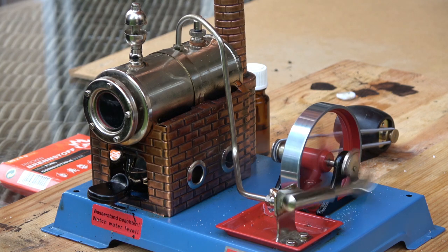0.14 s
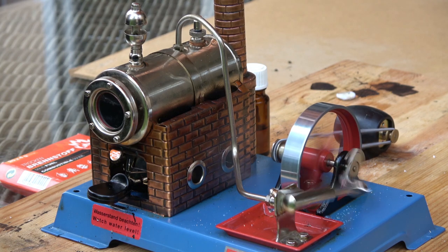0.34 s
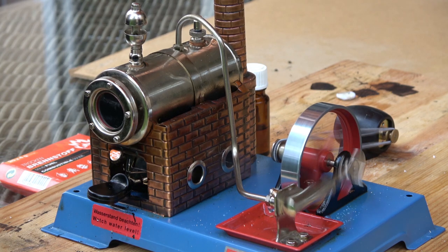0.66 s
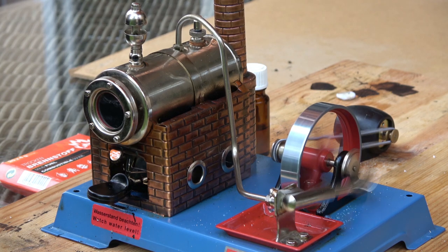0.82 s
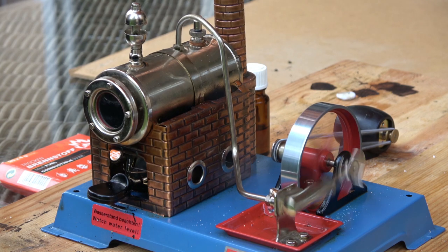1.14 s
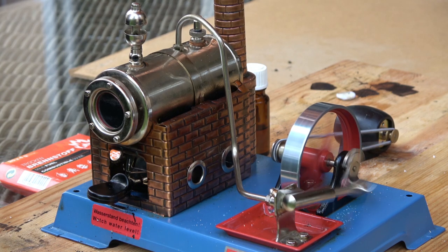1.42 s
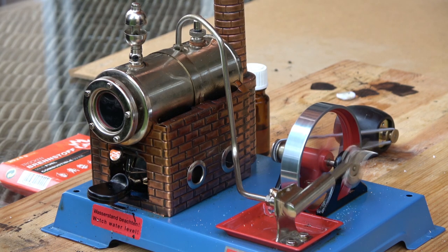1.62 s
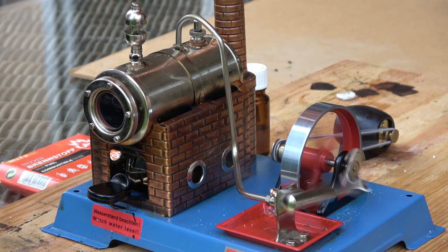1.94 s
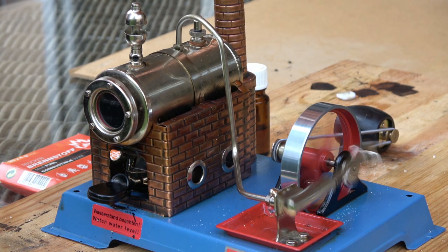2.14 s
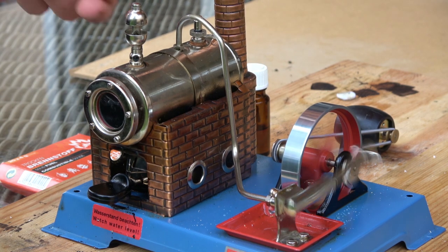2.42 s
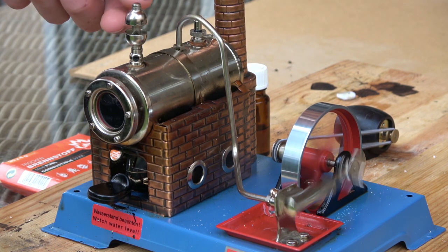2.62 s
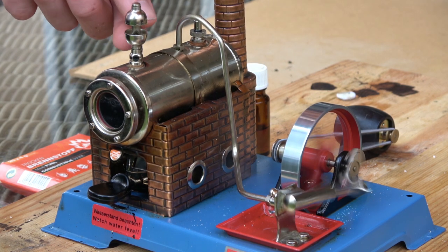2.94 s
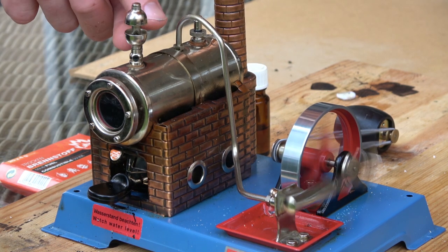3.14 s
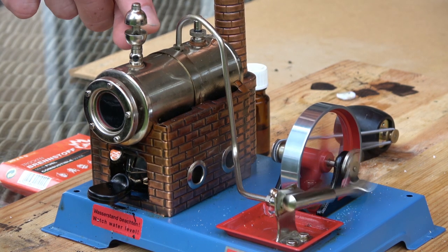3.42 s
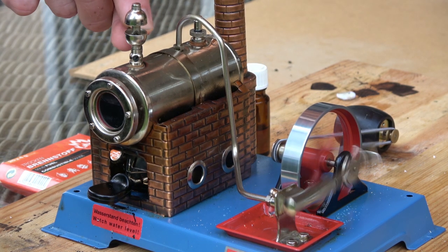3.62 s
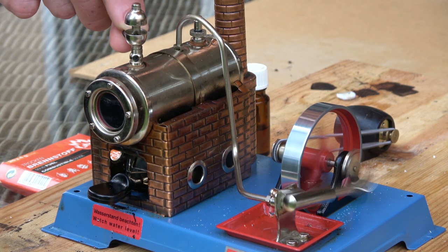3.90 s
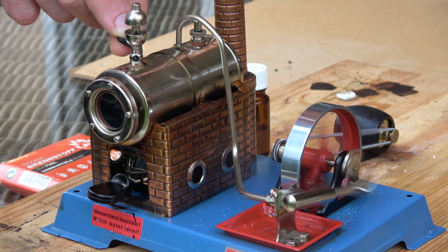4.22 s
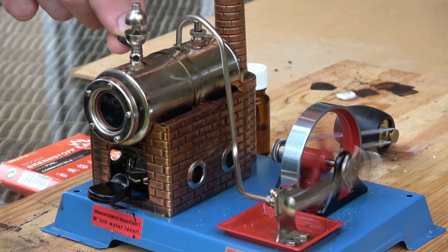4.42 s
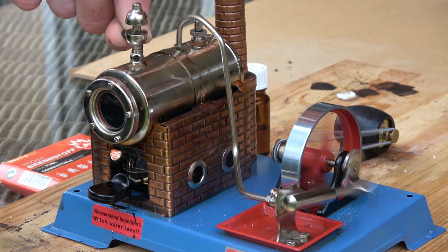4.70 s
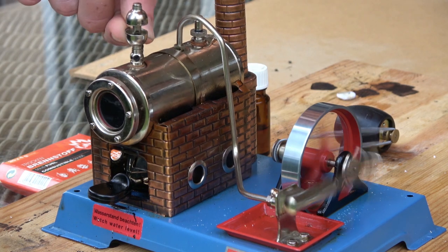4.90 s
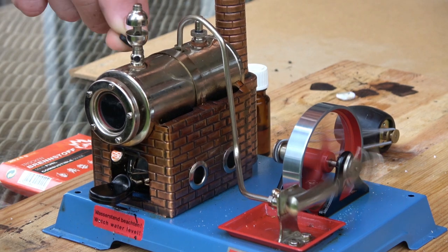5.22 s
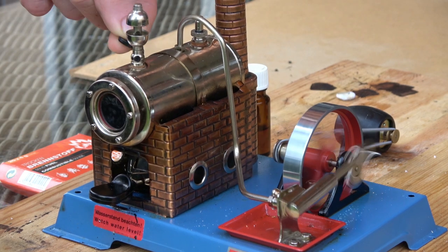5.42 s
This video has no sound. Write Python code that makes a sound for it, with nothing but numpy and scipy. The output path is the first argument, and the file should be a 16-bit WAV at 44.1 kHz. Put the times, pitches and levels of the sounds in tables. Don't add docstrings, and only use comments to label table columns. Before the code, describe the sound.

Rapid metallic chuffing of a miniature steam engine on a wooden bench, cut by one long shrill steam whistle and a second pull.

```python
import sys
import numpy as np
from scipy import signal
from scipy.fft import rfft, irfft, next_fast_len
from scipy.io import wavfile

SR = 44100
rng = np.random.default_rng(int(sys.argv[2]) if len(sys.argv) > 2 else 0)


def to_wav(s):
    ch = np.atleast_2d(s).T
    pcm = np.round(np.clip(ch, -1, 1) * 32767)
    wavfile.write(sys.argv[1], SR, pcm.astype(np.int16))


def decibels_to_gain(level_db):
    exponent = np.asarray(level_db, float) / 20
    return 10 ** exponent


N = 245195
TIME = np.arange(N) / SR


def level(x, db):
    return x * decibels_to_gain(db) / np.sqrt(np.mean(x ** 2))


def curve(t, points):
    return np.interp(t, *np.transpose(points))


def colour(x, points):
    hz, db = np.transpose(points)
    size = next_fast_len(N)
    f = np.maximum(np.arange(size // 2 + 1) * SR / size, 1)
    weight = decibels_to_gain(np.interp(np.log(f), np.log(hz), db))
    return irfft(rfft(x, size) * weight, size)[:N]


def ring(x, modes):
    out = 0
    for k, (hz, width, db) in enumerate(modes):
        out = out + (-1) ** k * decibels_to_gain(db) * signal.lfilter(*signal.iirpeak(hz, hz / width, SR), x)
    return out


def walk(rate_hz):
    lowpass = signal.butter(2, rate_hz, fs=SR, output="sos")
    return level(signal.sosfilt(lowpass, rng.standard_normal(N)), 0)


def grit(spread_db):
    jump = np.minimum(rng.exponential(size=N), 7)
    return level(rng.standard_normal(N) * decibels_to_gain(spread_db * jump), 0)


def swells(s, db, rise_ms, fall_ms):
    t_ms = np.arange(-2000, 4000) / SR * 1e3
    shape = np.where(t_ms < 0, np.exp(-(t_ms / rise_ms) ** 2), np.exp(-np.abs(t_ms) / fall_ms))
    marks = np.zeros(N + 6000)
    np.add.at(marks, np.clip((s * SR).astype(int), 0, N + 1999), decibels_to_gain(db))
    return np.abs(signal.fftconvolve(marks, shape)[2000:N + 2000])


FIRST_PUFF_S, TURN_S = .011, .052018
SLOW_START_S, SETTLE_TURNS = .01313, 31.37


def puff_times():
    count = np.arange(int(N / SR / TURN_S))
    run_up = SLOW_START_S * SETTLE_TURNS * (1 - np.exp(-count / SETTLE_TURNS))
    s = FIRST_PUFF_S + TURN_S * count + run_up
    return s[s < N / SR + TURN_S]


def engine(s):
    turn = np.gradient(s)
    scatter = rng.standard_normal((len(s), 3)).T
    slack = rng.standard_normal((len(s), 4)).T
    parts = exhaust(s, turn, scatter[0]) + base_rattle(s, turn, scatter[1], slack)
    parts += rod_scrape(s, turn, scatter[2], slack)
    parts += crank_knock(s, turn) + valve_click(s, turn, slack)
    hush = 1 - np.minimum(swells(s + 0.804 * turn, -5, 3.2, 2.1), .9)
    return parts + shaking(s) + leak() * hush


# f/Hz, level/dB per Hz
PUFF_COLOUR = [(2500, -32), (4500, -3), (6000, -3), (8000, 1), (10000, -1.5), (12500, -1.5), (14000, -7),
               (16000, -12)]


def exhaust(s, turn, scatter):
    db = -37 + 2.5 * (turn - TURN_S) / SLOW_START_S + 1.5 * np.tanh(scatter)
    robbed = sum((s > blast[0][0]) & (s < blast[-1][0]) for blast in BLASTS)
    env = swells(s + 0.0023, db - 0.5 * robbed, 9.2, 8.2)
    return level(colour(grit(2.6), PUFF_COLOUR), 3.55) * env


# f/Hz, width/Hz, level/dB
BASE_MODES = [(718, 80, -10.5), (916, 105, -10.5), (1100, 40, 0.5), (1240.4, 29.7, -0.5), (1558, 72, -2),
              (1758, 46, -2.5), (1916, 51, -0.5), (2288, 120, -10.5)]


def base_rattle(s, turn, scatter, slack):
    db = -35 + scatter
    env = swells(s + turn * (0.26 + 0.054 * slack[0]), db, 6.1, 6.5)
    env += swells(s + turn * (0.59 + 0.027 * slack[1]), db - 0.5 + 0.6 * slack[2], 11.2, 11.4)
    return ring(level(grit(2.9), 17.26) * env, BASE_MODES)


# f/Hz, width/Hz, level/dB
ROD_MODES = [(3038, 15, -7.5), (3282, 45, -9.5), (3865, 158, -1), (4380, 34, 0)]
# f/Hz, width/Hz, level/dB
GLAND_MODES = [(5230, 780, -8), (6160, 190, -6.5), (7600, 390, -6)]
# t/s, level/dB
BLOW_BY_LEVEL = [(0, -7), (.8, -3.5), (1.8, -0.5), (4.2, 2.5), (5.56, -3.5)]


def rod_scrape(s, turn, scatter, slack):
    db = -36.5 + scatter
    env = swells(s + turn * (0.18 + 0.0074 * slack[3]), db, 1.6, 9.0)
    env += swells(s + turn * (0.42 + 0.083 * slack[1]), db - 0.5 + 2.9 * slack[0], 3.3, 4.9)
    scrape = ring(level(grit(2.14), 17.04) * env, ROD_MODES)
    blow_by = ring(level(grit(3.2), 15.96) * env, GLAND_MODES)
    return scrape + blow_by * decibels_to_gain(curve(TIME, BLOW_BY_LEVEL))


# t/s, knock level/dB
PIN_PLAY_LEVEL = [(0, -40), (.35, -37), (.55, -31.5), (.95, -27.5), (1.2, -29.5), (1.4, -33), (1.9, -28.5),
                  (2.4, -32), (2.8, -27.5), (3.25, -26.5), (3.8, -38), (4.45, -28), (4.75, -32),
                  (5.05, -27), (5.56, -29)]
# t/s, level/dB
ODD_KNOCK_EVENTS = [(.188, -54), (.306, -48), (0.864, -24.5), (0.988, -25.5), (1.519, -29.5), (1.637, -42),
                    (1.752, -37), (1.805, -27.5), (2.034, -23), (2.092, -41), (2.202, -23.5),
                    (2.259, -21.5), (2.593, -27), (3.731, -46), (3.785, -31), (4.321, -27), (5.011, -41),
                    (5.222, -24)]
# t/s, level/dB
RETURN_KNOCK_LEVEL = [(0, -49), (1, -29.5), (1.6, -42), (2.4, -35), (2.9, -30.5), (3.9, -30.5),
                      (4.3, -27.5), (5.56, -36)]


def knocks(s, turn):
    slack = 0.02496
    scatter_db = 1.3
    chance = rng.standard_normal((len(s), 4)).T
    hit = s + turn * (.66 + slack * chance[0])
    db = curve(hit, PIN_PLAY_LEVEL) + scatter_db * chance[1]
    odd_s, odd_db = np.transpose(ODD_KNOCK_EVENTS)
    odd = np.abs(hit[:, None] - odd_s).argmin(axis=0)
    hit[odd], db[odd] = odd_s, odd_db
    back = s + turn * (.41 + slack * chance[2])
    back_db = curve(back, RETURN_KNOCK_LEVEL) + scatter_db * chance[3]
    return np.append(hit, back), np.append(db, back_db)


# f/Hz, width/Hz, level/dB
TIN_MODES = [(1455, 26, 1.5), (1532.4, 33, 3.5), (1946, 93, -14.5), (1100, 130, -12), (4010, 210, -28)]


def crank_knock(s, turn):
    hit, db = knocks(s, turn)
    return ring(swells(hit - .004, db + 35, 0.033, 0.029), TIN_MODES)


# f/Hz, width/Hz, level/dB
CLICK_MODES = [(1020, 260, -16), (1810, 45, -16), (2237, 130, -3.5), (3820, 109, -0.5), (5580, 350, -4),
               (8260, 530, -10), (10900, 590, -11)]
# t/s, level/dB
CLICK_LEVEL = [(0, -32), (.6, -29), (1, -35), (1.5, -39), (2, -31), (4, -30.5), (4.8, -33), (5.1, -31),
               (5.25, -33), (5.56, -33)]


def valve_click(s, turn, slack):
    db = curve(s, CLICK_LEVEL) + 0.96 * slack[2]
    env = swells(s + 0.622 * turn, db, 1.46, 3.63)
    return ring(level(grit(0.39), 13.6) * env, CLICK_MODES)


# t/share of opening, shift f/Hz, level/dB, wetness/0-1
OPENING_MOVES = [(-1, -300, -44, .3), (-.25, -200, -24, .6)]
# t/s, shift f/Hz, level/dB, wetness/0-1
SHUTTING_MOVES = [(.003, -200, -17, .05), (.011, -900, -27, 0)]


def valve(blast, opening_s):
    def moved(row, moves, scale):
        return [(row[0] + s * scale, row[1] + hz, row[2] + db, wet) for s, hz, db, wet in moves]
    return moved(blast[0], OPENING_MOVES, opening_s) + blast + moved(blast[-1], SHUTTING_MOVES, 1)


# t/s, f/Hz, level/dB, steam wetness/0-1
BLASTS = [
    [(4.172, 4940, -18, 0.74), (4.205, 4870, -17, 0.6), (4.236, 4925, -16, .5), (4.241, 5120, -15.5, .4),
     (4.295, 5090, -17, .5), (4.302, 5020, -16.5, .4), (4.345, 4975, -15.5, 0.1),
     (4.455, 5205, -16.5, 0.24), (4.702, 5222, -17, 0.17)],
    [(5.312, 4880, -29, .15), (5.326, 5090, -23, .25), (5.35, 5110, -19, .4), (5.388, 5065, -21, .3),
     (5.392, 5190, -15.5, .2), (5.467, 5000, -17.5, 0.3), (5.482, 5135, -16, 0.16),
     (5.515, 5105, -18.5, 0.52), (5.56, 5193, -17.5, .3)],
]
OPENING_TIMES = [
    .04,
    .01,
]
# t/s, depth level/dB, length/ms
WHISTLE_DIPS = [(4.206, -8, 4), (4.219, -8, 2), (4.232, -5, 1.5), (4.238, -7, 1.5), (4.322, -3, 3),
                (4.348, -3, 3), (4.383, -6, 4), (4.412, -6, 3), (4.428, -5, 5), (4.463, -2, 3), (5.42, -4, 3),
                (5.445, -3, 3), (5.467, -3, 3), (5.476, -4, 2), (5.488, -5, 2), (5.497, -9, 2.5),
                (5.514, -3, 4), (5.548, -3, 2)]
OVERTONE_LEVELS = [-36.5, -50]
# f/Hz, level/dB per Hz
BREATH_COLOUR = [(2500, -24), (4000, -10), (5600, 1.5), (6800, -6.5), (7800, -0.5), (8800, -6),
                 (13000, -13), (16000, -24)]


def whistle():
    blasts = [valve(*pair) for pair in zip(BLASTS, OPENING_TIMES)]
    s, *columns = np.transpose(sum(blasts, []))
    hz, db, wet = (np.interp(TIME, s, column) for column in columns)
    flutter = 0.077 + (0.186 - 0.077) * wet
    breath_db = -47 + (-30 + 47) * wet
    for at, depth, ms in WHISTLE_DIPS:
        db = db + depth * np.exp(-((TIME - at) * 1e3 / ms) ** 2)
    phase = 2 * np.pi * np.cumsum(hz + 200 * flutter * walk(232)) / SR
    tone = np.sin(phase)
    for k, overtone_db in enumerate(OVERTONE_LEVELS):
        tone += decibels_to_gain(overtone_db) * np.sin((k + 2) * phase)
    sag = 1 - 0.46 * flutter * np.abs(walk(184))
    tone *= np.sqrt(2) * decibels_to_gain(db) * sag
    halo = walk(300) * np.sin(phase) + 0.5 * walk(400) * np.cos(phase)
    hiss = level(colour(grit(3.1), BREATH_COLOUR), -3) * decibels_to_gain(0.83 * walk(30))
    valve_open = sum((TIME > blast[0][0]) & (TIME <= blast[-1][0]) for blast in blasts)
    return (tone + decibels_to_gain(breath_db) * (halo + hiss)) * valve_open


# left delay/ms, right delay/ms, level/dB
WALL_ECHOES = [(.4, .55, -17), (11, 9.3, -28), (24, 25.5, -17),
               (47, 52, -33), (78, 71, -33), (104, 101, -31), (131, 137, -40)]


def walls(x):
    out = np.array([x, x])
    for *delay_ms, db in WALL_ECHOES:
        for port, ms in zip(out, delay_ms):
            lag = int(ms * SR / 1e3)
            port[lag:] += decibels_to_gain(db) * x[:-lag]
    return out


# t/s, left minus right level/dB
HAND_BALANCE = [(4.25, -.5), (4.5, -2), (4.8, -2), (5.3, .5)]


def hand_shade(x):
    return x * decibels_to_gain(curve(TIME, HAND_BALANCE) * np.array([[.5], [-.5]]))


# f/Hz, width/Hz, level/dB
BENCH_MODES = [(74.6, 4.6, -5.5), (154, 7.4, -3.5), (177.5, 6.4, -1.5), (217.2, 16.8, 1), (306.5, 5.3, 4),
               (369, 12, 1), (399.6, 11.5, 0), (462, 26, 1.5), (715, 16, 5), (750, 26, 6.5), (834, 25, 6),
               (1163, 5.7, 7), (1230, 21, -13), (1501, 43, 9.5)]
# t/s, level/dB
SING_LEVEL = [(0, -67), (1.5, -67), (3, -84), (4.2, -62), (4.6, -60.5), (5.56, -58.5)]


def shaking(s):
    angle = np.interp(TIME, s, np.arange(len(s)))
    orders = np.arange(1, 100)[:, None]
    one_turn = np.linspace(0, 1, 1024)
    pattern = np.sin(2 * np.pi * (orders * one_turn + rng.random(orders.shape))).sum(axis=0)
    pattern *= 1 - 0.4 * np.cos(2 * np.pi * (one_turn - .03))
    shake = np.interp(angle % 1, one_turn, pattern) * decibels_to_gain(0.2 * walk(4.1))
    hum = level(ring(shake, BENCH_MODES), -49)
    sing = np.sin(2 * np.pi * 22 * angle) * decibels_to_gain(curve(TIME, SING_LEVEL) + 5)
    return hum + sing


# f/Hz, level/dB per Hz
LEAK_COLOUR = [(30, -46), (200, -19.5), (535, -19), (1100, -5.5), (1520, -6), (2770, -14.5), (3900, -13.5),
               (15500, -31)]


def leak():
    return level(colour(grit(1.12), LEAK_COLOUR) * decibels_to_gain(0.67 * walk(10.0)), -40.5)


# t/s, level/dB, f/Hz
BENCH_NUDGES = [(1.27, -68, 50), (1.4, -69, 55), (1.57, -61, 260), (1.65, -66, 120), (2.11, -65, 70),
                (2.6, -70, 70), (4.32, -64, 60), (4.9, -60, 130)]


def nudges():
    out = np.zeros(N)
    for s, db, hz in BENCH_NUDGES:
        out += decibels_to_gain(db) * np.sin(2 * np.pi * hz * TIME) * np.exp(-((TIME - s) / 0.048) ** 2)
    return out


# t/s, length/s, f/Hz, level/dB
FAR_MOTORS = [
    (.6, 0.27, 305, -55),
    (1.1, 0.38, 262, -69),
    (1.898, 0.24, 300, -62.5),
]


def drones():
    drift = 2 * np.pi * np.cumsum(2.9 * walk(4.8)) / SR
    out = np.zeros(N)
    for s, length, hz, db in FAR_MOTORS:
        out += decibels_to_gain(db) * np.sin(2 * np.pi * hz * TIME + drift) * np.exp(-((TIME - s) / length) ** 2)
    return out


# t/s, level/dB
CAMERA_GAIN = [(0, -2), (2, 0), (4.19, 0), (4.3, -10), (4.6, -13.5), (4.75, -10), (5.3, -8), (5.56, -10.5)]
# f/Hz, side minus mid level/dB
PORT_WIDTH = [(30, -41), (70, -30), (160, -24), (400, -27), (1000, -26), (2380, -31), (4400, -14),
              (9000, -8.5)]


def scene():
    mid = (engine(puff_times()) + nudges() + drones()) * decibels_to_gain(curve(TIME, CAMERA_GAIN))
    side = colour(mid * walk(70), PORT_WIDTH) * decibels_to_gain(-1.5)
    return mid + side * np.array([[1], [-1]]) + hand_shade(walls(whistle()))


def band_limit(x):
    return signal.sosfilt(signal.butter(12, 15750, fs=SR, output="sos"), x)


def record(dry):
    ports = np.array([dry[0], colour(dry[1], [(4000, 0), (8000, 0.7)])])
    top_cut = signal.ellip(10, .3, 60, 15800, fs=SR, output="sos")
    return band_limit(signal.sosfilt(top_cut, ports))


dry = scene()
out = record(dry)
to_wav(out)
```